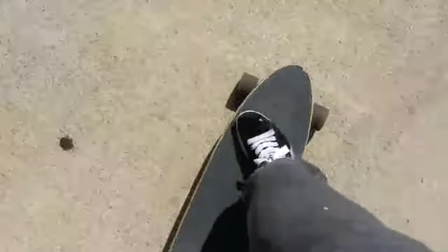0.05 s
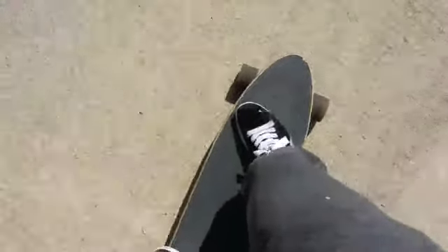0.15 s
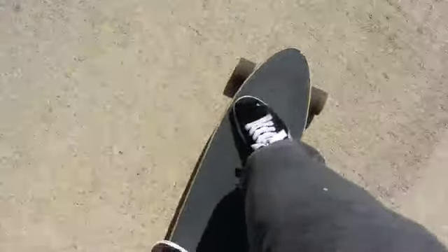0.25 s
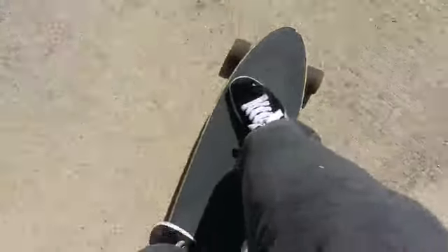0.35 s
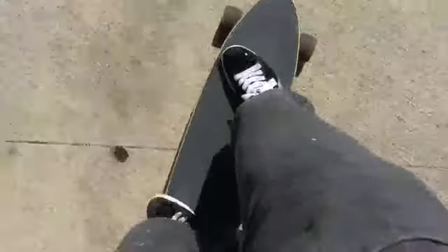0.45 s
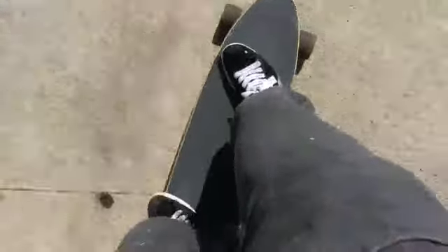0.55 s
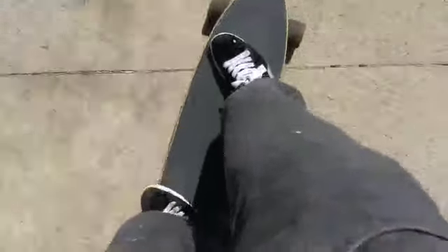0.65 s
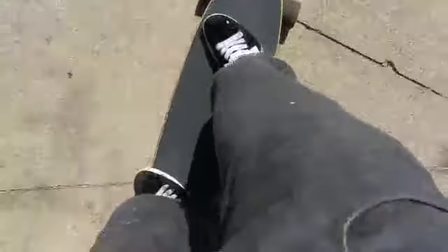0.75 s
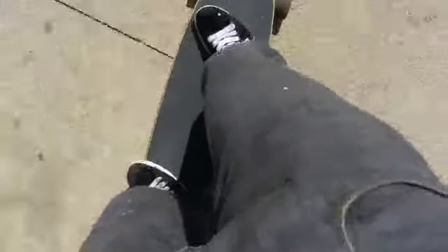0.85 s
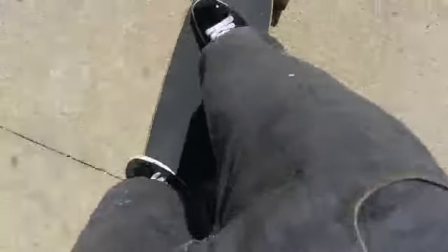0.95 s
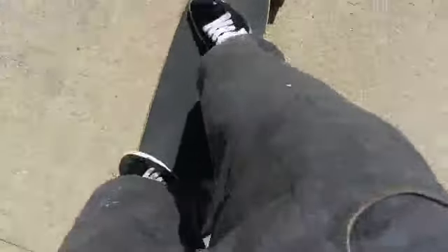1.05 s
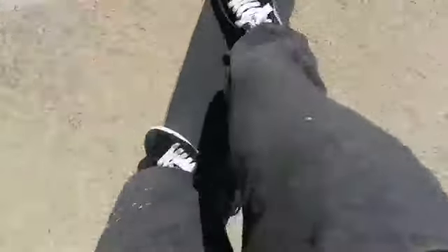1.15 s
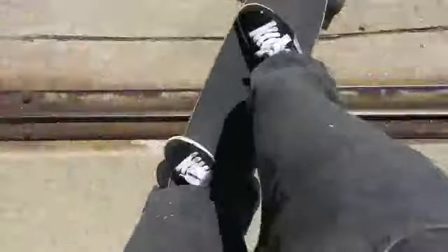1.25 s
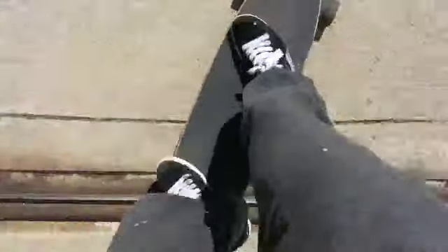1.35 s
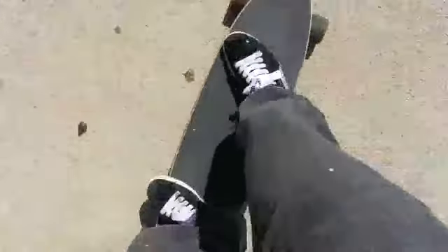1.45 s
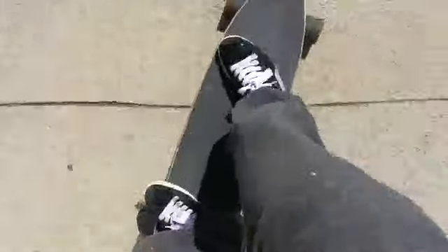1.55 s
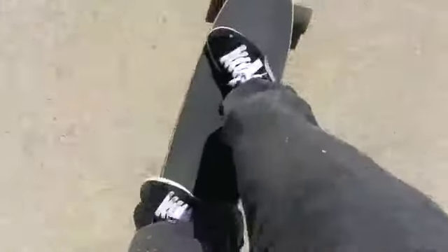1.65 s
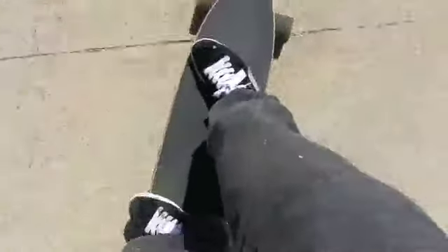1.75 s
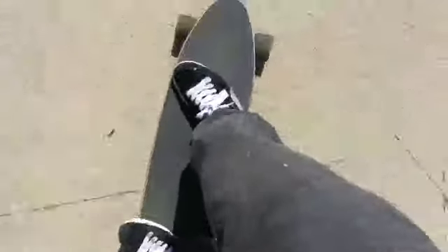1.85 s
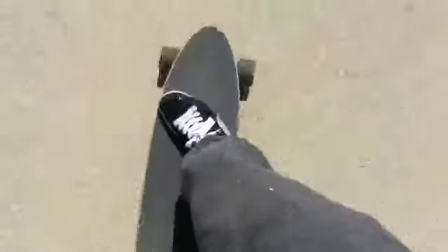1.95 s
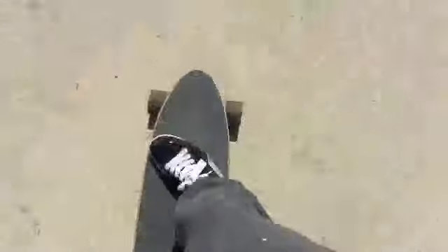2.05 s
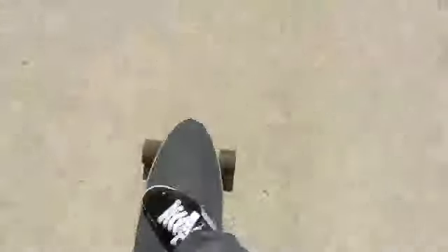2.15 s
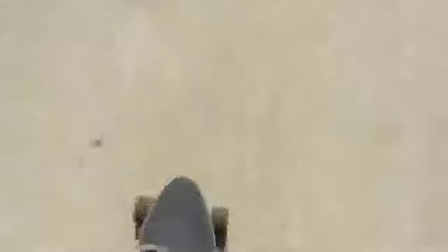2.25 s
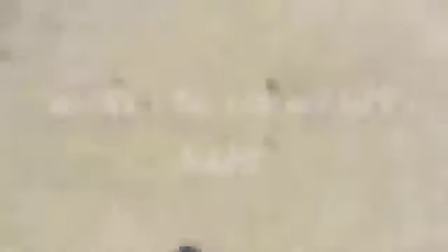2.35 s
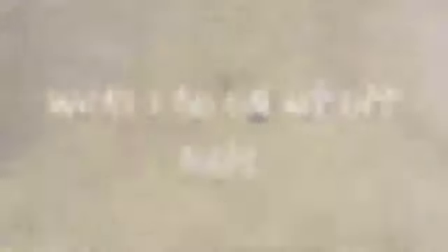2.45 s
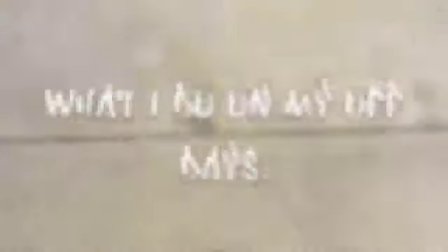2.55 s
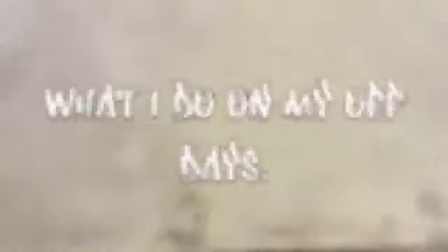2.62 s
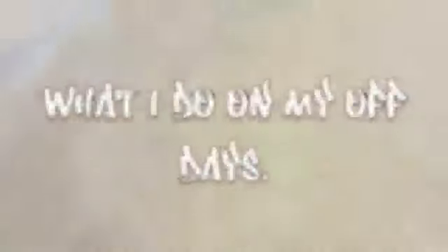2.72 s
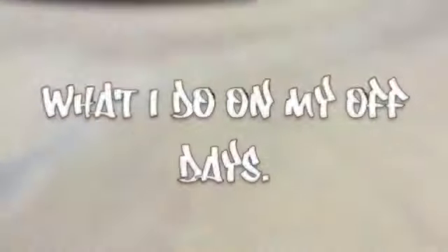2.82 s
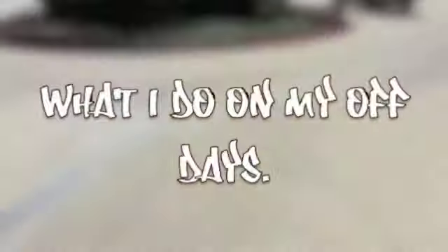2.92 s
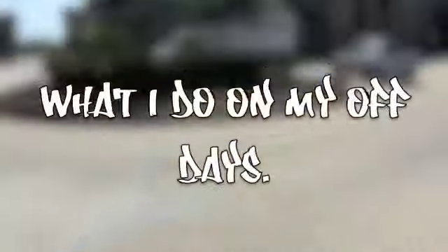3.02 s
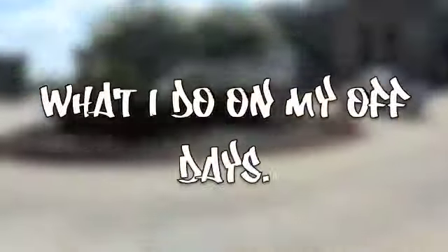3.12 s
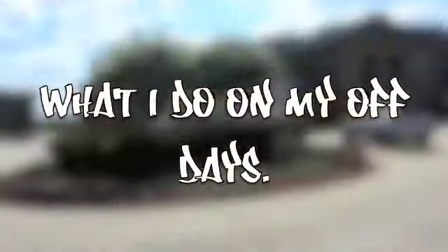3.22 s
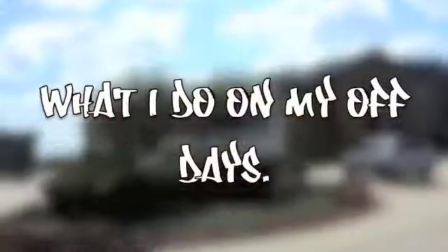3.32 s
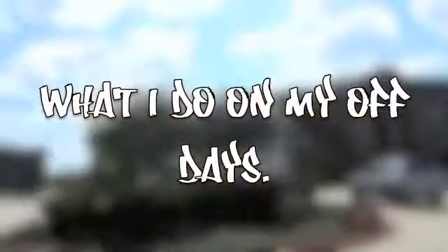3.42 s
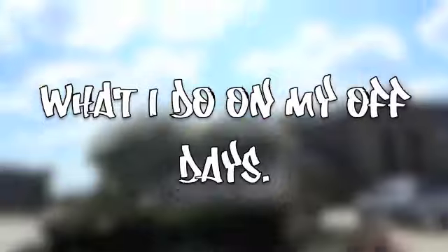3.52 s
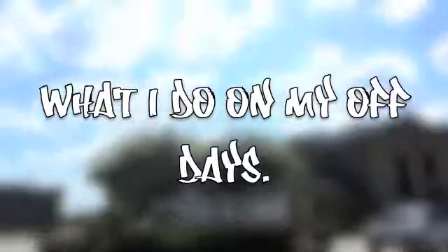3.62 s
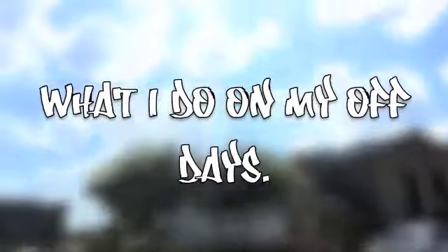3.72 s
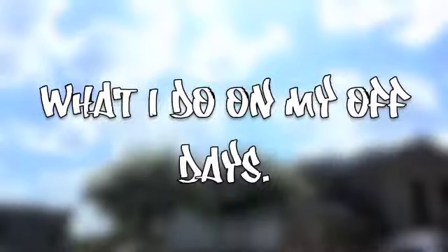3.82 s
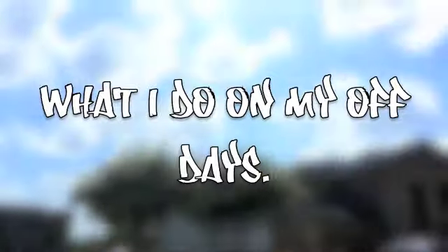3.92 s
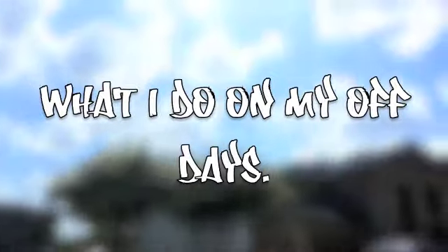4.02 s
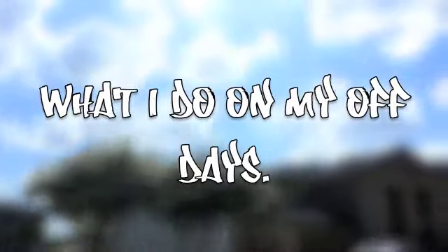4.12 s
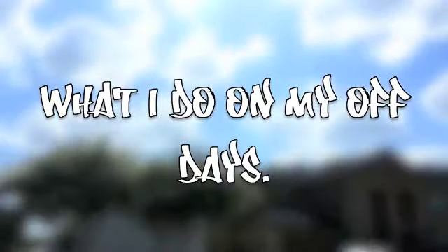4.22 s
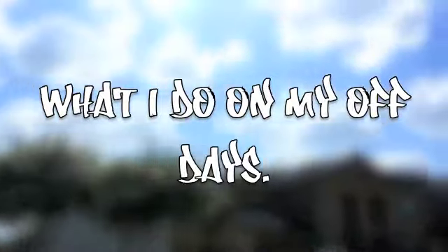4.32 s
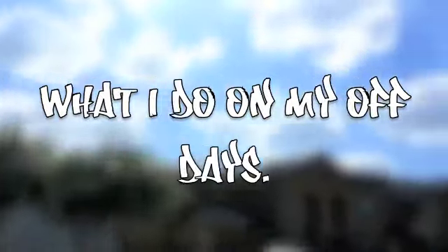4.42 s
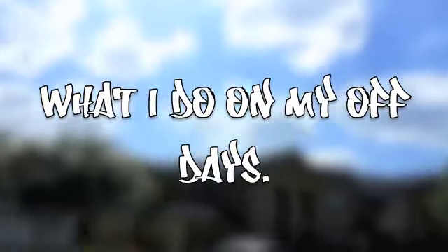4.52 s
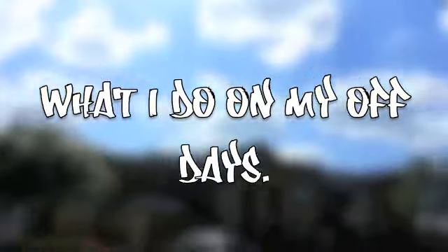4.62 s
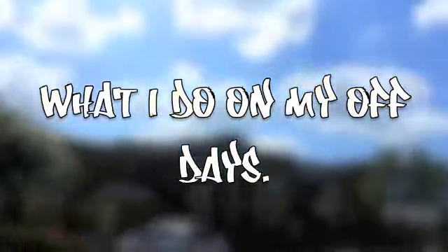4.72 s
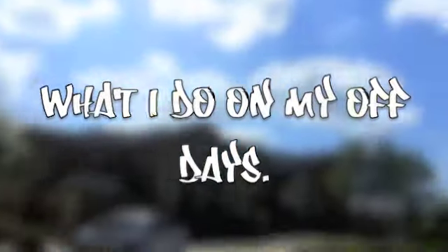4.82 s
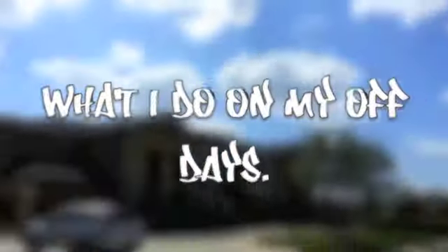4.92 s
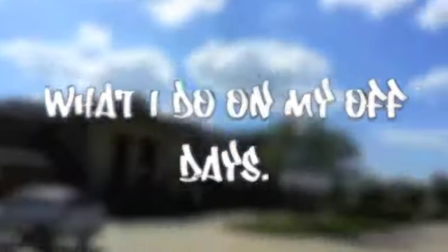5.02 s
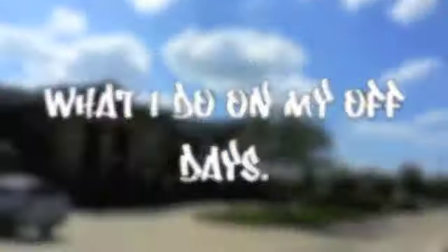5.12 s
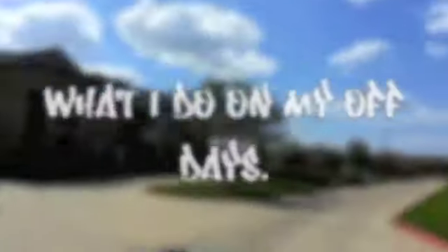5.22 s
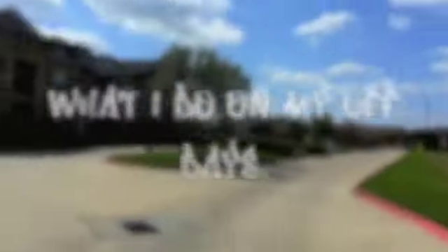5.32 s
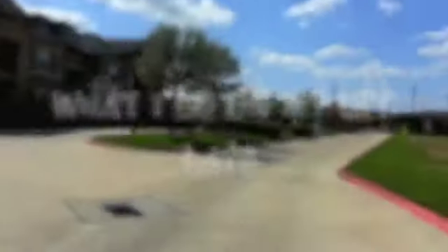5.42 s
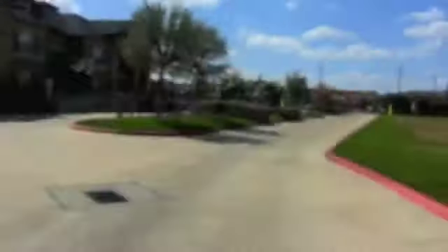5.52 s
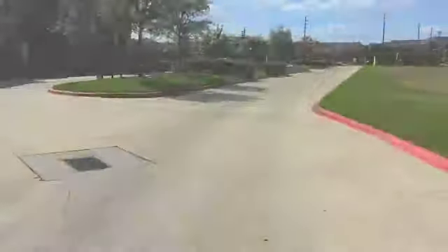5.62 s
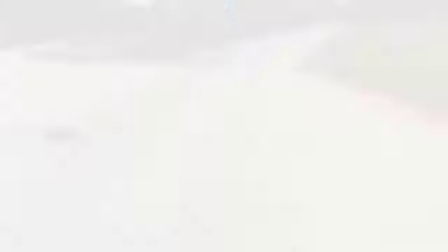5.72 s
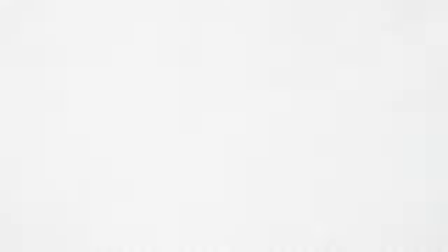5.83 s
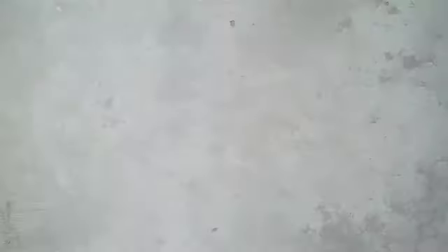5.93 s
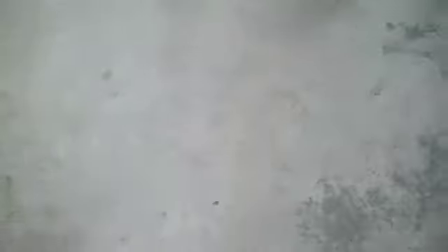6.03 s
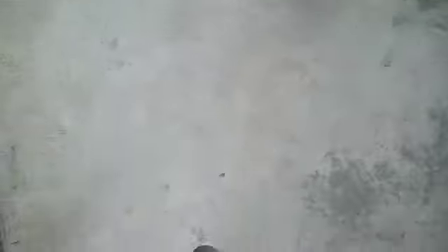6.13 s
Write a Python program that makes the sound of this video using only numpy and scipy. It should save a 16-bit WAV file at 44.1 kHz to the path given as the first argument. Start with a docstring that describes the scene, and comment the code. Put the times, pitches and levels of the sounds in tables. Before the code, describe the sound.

From 0 s a longboard is already rolling on coarse concrete, close and dry outdoors at a handheld stereo microphone: a woody low-mid drone, grainy tread scrape, popping grit, a loose washer's tinny ticks and irregular hollow knocks. Around 0.95 s the tread hiss surges with short low thumps; at 1.09-1.2 s the front wheels smash over a loose steel cover, a dense, choked clanging rattle, and at 1.32-1.41 s the rear wheels strike it again, loud and clipped. Small rattles die by 1.55 s. Softer rolling follows, with light knocks near 2.0 and 2.2 s and a faint thin whistle at 2.25 s. Hard paired knocks hit at 2.88 and 3.12 s. Faint falling whistles come at 3.4-4.1 s as a narrow hiss grows. From 4.7 s bright sand rasps beneath buzzing washer ticks, with one small knock. Everything fades from 5.67 to silence at 5.85 s.

```python
"""A longboard rolls along a concrete pavement, heard at a two-port microphone in the rider's hand.
From the start, grain noise drives deck and tread, grit pops, a loose washer pings and wheel knocks ring modes.
The tread flares just before both axles clatter over a loose steel drain cover at about 1.1 s (choked ringing
modes, noise bursts); short low noise thumps fall from 1.0 s, thin gliding sines whistle from 2.3 s, a joint
knocks at 2.9 s, sand rasps from 4.7 s, and the sound fades out from 5.7 s. The hardest blows are clipped."""
import sys
import numpy as np
from scipy import signal
from scipy.fft import rfft, irfft
from scipy.io import wavfile

SR = 44100
rng = np.random.default_rng(int(sys.argv[2]) if len(sys.argv) > 2 else 0)


def unload_wav(signal):
    """Save mono or channel-first audio to the path in sys.argv[1] as 16-bit WAV at rate SR, clipped to [-1, 1]."""
    wavfile.write(
        sys.argv[1],
        SR,
        np.round(np.clip(np.atleast_2d(signal).T, -1, 1) * 32767).astype(np.int16),
    )


N = 272097
TIME = np.arange(N) / SR  # s
FREQ = np.fft.rfftfreq(N, 1 / SR)  # Hz

# All levels are relative: layer gains and the microphone gain are applied later.

# Spectrum of the steady airstream at the microphone. Each row: frequency in Hz, density in dB per Hz.
BREEZE_SPECTRUM = [(20, -27.5), (45, -12), (70, -1.5), (140, 0.5), (220, -14.5), (2000, -110)]
BREEZE_DB = -48
# Spectrum of the low thumps. Each row: frequency in Hz, density in dB per Hz.
THUMP_SPECTRUM = [(20, -23), (60, -22.5), (120, -6), (180, -1.5), (240, 6), (330, -7.5), (600, -16),
                  (2000, -60)]
# Short low thumps, most of them stronger at the right port. Each row: start in seconds, level in dB,
# length in seconds, left-minus-right gain in dB (on top of the ports' own tilt).
THUMPS = [(0.997, -14.5, 0.012, -17.5), (1.013, -15.5, .011, -20.5), (1.225, -28.5, 0.03, -22),
          (1.269, -27, 0.025, -21), (1.347, -28, 0.19, -13), (1.93, -22.5, 0.042, -17),
          (1.996, -19, 0.01, -14), (3.115, -22, 0.035, 2), (4.756, -27, 0.015, 1)]
# Thin high whistles. Each row: start in seconds, length in seconds, start in Hz, end in Hz, level in dB.
WHISTLES = [(2.253, 0.12, 4830, 4820, -54.5), (3.434, 0.25, 9060, 8480, -54.5),
            (3.58, 0.28, 9800, 9400, -64), (3.86, 0.26, 9100, 8700, -65), (3.425, 0.24, 13750, 13480, -70),
            (3.823, 0.25, 14220, 14080, -70)]

# Spectrum of sand under the tread. Each row: frequency in Hz, density in dB per Hz.
SAND_SPECTRUM = [(3000, -29), (4400, 3), (5150, -1), (5600, -10), (7500, -32), (10000, -42), (11700, -18),
                 (14500, -38)]
# The sandy stretch. One row: start in seconds, end in seconds, level in dB.
SANDY_STRETCH = (4.7, 5.86, -52)
# Spectrum of loose grit under a wheel. Each row: frequency in Hz, density in dB per Hz.
POPS_SPECTRUM = [(300, -25), (700, 2), (1500, -2), (2500, -7.5), (4000, -23.5), (9000, -49.5)]
# level at the mean rumble, dB gained per dB of rumble, mean rate
POPS_DB, POPS_FOLLOW, POPS_PER_S = -43.5, 0.9, 320

# Modes of the washer's ping. Each row: frequency in Hz before the pitch factor, level in dB, t60 in seconds.
WASHER_MODES = [(1900, -16, .015), (2700, -16, .008), (3370, -6, .005), (3550, -1.5, .008),
                (3800, -5, .005), (4250, -13, .004), (5150, -17, .003)]
# Spells of rattling axle hardware. Each row: start in seconds, end in seconds, level in dB.
CHATTERS = [(0, 0.192, -50), (.318, 1.48, -44), (1.5, 2.05, -49.5), (3.15, 3.425, -48),
            (3.53, 4.504, -51.5), (4.54, 4.9, -45), (4.934, 5.343, -42), (5.402, 5.8, -44)]
CHATTER_RISE_S, CHATTER_FALL_DB_PER_S = 0.023, 38
CHATTER_PER_S = 150  # bounce rate before its random drift
# The washer's clearest ticks. Each row: start in seconds, peak level in dB before TICK_DB is added.
TICKS = [(0.0174, -29.5), (0.0493, -31), (0.1491, -34), (0.165, -27), (0.1814, -27), (0.2563, -34),
         (0.3706, -28), (0.4189, -31), (0.4798, -34), (0.5571, -31), (0.5846, -27), (0.6175, -29.5),
         (0.6794, -28), (0.6964, -26), (0.7412, -25), (0.836, -32), (0.9517, -30), (0.9592, -26.5),
         (1.047, -24), (1.068, -19), (3.2226, -29.5), (3.2331, -32), (3.2545, -33), (3.2964, -31),
         (3.365, -28), (3.391, -31), (3.4028, -28), (3.4466, -34), (3.5414, -35), (3.5618, -32),
         (3.6122, -34), (4.6334, -35), (4.7062, -32), (4.7566, -24.5), (4.7612, -24), (4.8125, -33.5),
         (4.946, -33), (4.995, -25.5), (5.0439, -27), (5.255, -29), (5.2664, -28.5), (5.5084, -29.5)]
TICK_DB, TICK_T60_S = 1.5, 0.045

# Modes of the steel cover. Each row: frequency in Hz before detuning, level in dB, t60 in seconds.
STEEL_MODES = [(382, 1.5, 0.069), (1066, -5, .2), (1120, 2, .2), (1180, -5, 0.2), (1250, -13, .12),
               (1375, -14.5, .15), (1470, -12, .2), (1511, -4.5, .2), (1563, -4, .22), (1630, -3, .13),
               (1720, -8.5, .15), (1755, -4, .22), (1960, -11.5, .11), (2110, -10, .08), (2950, -13, .1),
               (3284, -11.5, .14), (3430, -11.5, .12), (3945, -8, .13), (4100, -4.5, .13),
               (4220, -7.5, .11), (4400, -10.5, .09), (4450, -7.5, .13), (4670, -11.5, .08)]
DETUNE = 0.005  # the wheels' weight shifts each mode by about this share from contact to contact
# Spectrum of steel on its frame. Each row: frequency in Hz, density in dB per Hz.
CLASH_SPECTRUM = [(150, -25.5), (400, 6), (750, -3), (1150, 2.5), (1750, -1), (2400, -7.5), (4300, -2),
                  (5500, -9.5), (8000, -13.5), (12500, -22.5), (14500, -23.5)]
# The cover rattling in its frame. Each row: start in seconds, ring level in dB, clash level in dB,
# brightness of the ring in dB per octave.
RATTLES = [(1.091, -2, -11, -2.5), (1.105, -8, -4.5, 1), (1.117, -10, -3, 5), (1.131, -1.5, -7.5, -1),
           (1.149, -7.5, -9.5, 2.5), (1.162, -9.5, -6, 0), (1.172, -14, -11, 1.5), (1.183, -9.5, -13, -1.5),
           (1.203, -19.5, -22, 1), (1.219, -23.5, -22, 1), (1.235, -22, -27.5, -1), (1.248, -24.5, -29, 1),
           (1.265, -20.5, -27.5, -0.5), (1.297, -23.5, -27, -3.5), (1.322, -12, -19, 7.5),
           (1.3257, -10.5, -13.5, 6.5), (1.33, -14.5, -6.5, 7), (1.34, -18, -11.5, 0.5),
           (1.352, -18, -17.5, 0.5), (1.374, -13, -19.5, 0), (1.383, -21.5, -14.5, 4.5),
           (1.397, -15.5, -22.5, -0.5), (1.461, -27.5, -35, -4), (1.494, -25, -34.5, -6.5),
           (1.527, -32.5, -38, 1.5)]
# A harder contact damps more. Each row: ring level of the contact in dB, share of the old ring that is left.
CHOKE = [(-27.5, 0.78), (-6, 0.41)]

# Modes of the wooden deck. Each row: frequency in Hz before the pitch factor, level in dB, t60 in seconds.
DECK_MODES = [(260, -16, 0.12), (325, -9, 0.051), (415, -6, 0.019), (467.7, 4.5, 0.067), (532, -5, 0.015),
              (688, -8, 0.031), (843, -13.5, 0.027)]
# Modes of the axles. Each row: frequency in Hz before the pitch factor, level in dB, t60 in seconds.
AXLE_MODES = [(659, 2, 0.058), (867, 0.5, 0.045), (975, -1.5, 0.037), (1262, -5.5, 0.034),
              (1593, -6.5, 0.037), (1755, -4.5, .04), (1935, -3.5, 0.045), (2750, -5, .035),
              (2893, -9.5, .035), (3500, -3.5, 0.021), (3570, -7.5, 0.022), (4350, -9.5, .02)]
# Spectrum of a wheel on an edge. Each row: frequency in Hz, density in dB per Hz.
CRACK_SPECTRUM = [(100, -16), (350, 8.5), (650, 2), (900, -4.5), (1600, -8), (2800, -7), (4000, -9),
                  (6000, -21), (9000, -30.5), (14500, -36.5)]
# A wheel meets an edge of the pavement or of the cover, the rear pair about 0.23 s after the front.
# Each row: start in seconds, deck level in dB, crack level in dB, axle ping level in dB,
# deck pitch as a factor.
KNOCKS = [(.004, -2, -21, -28, 0.97), (.097, -6.5, -28.5, -25, 1.03), (.259, -22, -26.5, -26, .8),
          (.375, -7, -21.5, -21, 0.83), (.484, -6, -24.5, -26, 0.81), (.628, -12, -28, -29, 0.88),
          (.745, -11, -26.5, -28.5, 1.02), (.953, -6, -20.5, -26, 1.01), (.97, -12, -23, -25.5, 1.11),
          (1.093, -11, -10.5, -14, 0.95), (1.107, -1, -5.5, -8, 0.87), (1.143, -9, -22, -24, 0.81),
          (1.163, -10, -14.5, -15.5, 1.04), (1.184, -12, -20, -19, .94), (1.266, -6.5, -19, -20, .9),
          (1.28, -13, -21, -21, 0.93), (1.326, -14, -17, -16, .62), (1.338, -7, -6.5, -11.5, 0.57),
          (1.3594, 0, -6.5, -8.5, 1.13), (1.365, -5, -10, -14.5, 1.35), (1.378, -9, -5.5, -13.5, 1.3),
          (1.3945, 1.5, -7, -4.5, 1.04), (1.401, -4, -10.5, -10, 1.42), (1.4125, -3, -12.5, -13.5, 1.02),
          (1.498, -10, -26.5, -26, 0.92), (1.962, -12, -27, -26, 0.804), (1.997, -13, -25, -23.5, 1),
          (2.034, -8.5, -29.5, -22, 1.05), (2.196, -8.5, -33, -25, .96), (2.872, 4.5, -10, -8.5, 0.89),
          (2.885, 5, -10.5, -6.5, 0.96), (2.896, -11, -14, -16, 0.93), (2.917, -19, -20.5, -25.5, 1),
          (3.108, -7, -13.5, -14.5, 0.98), (3.123, -4.5, -12, -12.5, .7), (3.128, -8.5, -14.5, -12.5, 1.53),
          (3.14, 2, -12.5, -13.5, 1), (3.154, 0, -13.5, -17.5, 1.01), (4.7565, -10.5, -21, -25, 0.6)]

# Spectrum of the narrow tread hiss. Each row: frequency in Hz, density in dB per Hz.
SWISH_SPECTRUM = [(900, -62.5), (1700, -29.5), (2300, -5), (2700, 4), (3100, -7), (3500, -24), (7000, -28),
                  (11000, -71)]
# The smoother pavement. One row: start in seconds, end in seconds, level in dB.
SMOOTH_STRETCH = (1.6, 6.3, -42.5)
SWISH_RISE_S = 3.2
# Spots in the concrete that grind the tread. Each row: middle in seconds, length in seconds, gain in dB.
ROUGH_SPOTS = [(.018, .033, 1.5), (0.038, .025, 4.5), (.135, .03, -5), (0.182, .03, 2), (.215, .06, -3),
               (0.438, .03, 3.5), (0.506, 0.048, 6.5), (0.538, 0.057, 3.5), (.583, .028, 4),
               (.698, .027, 2.5), (.752, 0.032, 2), (.97, .02, 2), (1.074, .018, 4), (1.97, 0.064, 5),
               (2.032, 0.054, 3), (2.086, .028, 2), (2.403, 0.033, 0), (3.235, 0.079, 6.5), (3.56, .035, 3),
               (5.516, .023, 5)]
# How hard the pavement shakes the board. Each row: time in seconds, deck drone in dB, coarse rumble in dB.
PAVEMENT = [(0.0, -21.5, -26), (0.389, -23.5, -21.5), (0.86, -21.5, -24.5), (1.22, -21.5, -27.5),
            (1.33, -21, -18), (1.59, -24.5, -26.5), (1.9, -28, -26.5), (2.1, -23.5, -32),
            (2.49, -27.5, -30.5), (3.06, -27, -42), (3.29, -28.5, -34.5), (4.08, -29.5, -41),
            (4.78, -29, -37.5), (5.15, -28.5, -33), (5.38, -26.5, -40.5), (5.55, -30, -35.5)]
DRONE_DB, RUMBLE_DB = 1.48, -1.34  # added to the pavement's two levels
# tread level at the mean shaking, and dB gained per dB of shaking
SCRAPE_DB, SCRAPE_FOLLOW = -37.5, 0.14
HISS_DB, HISS_FOLLOW = -45, 0.67
# The tread flares just before the clatter and dies away through it. One row: start of the rise in seconds,
# start of the fall in seconds, scrape level in dB, hiss level in dB (neither reached in full, as the fall
# starts before the rise).
FLARE = (0.93, 0.9, -25, -27)
FLARE_RISE_S, FLARE_FALL_DB_PER_S = 0.048, 31
# dust level at the mean rumble, dB gained per dB of rumble, dust level added in the flare
FIZZ_DB, FIZZ_FOLLOW, FLARE_FIZZ_DB = -69, 1.45, -48
# Spectrum of the deck drone. Each row: frequency in Hz, density in dB per Hz.
DRONE_SPECTRUM = [(120, -27.5), (200, -13), (247, -11.5), (376, -1.5), (489, 2), (564, -4), (668, -8),
                  (739, -11), (846, -11), (1120, -18.5), (1280, -25), (1500, -21.5), (1950, -36.5),
                  (3300, -120)]
# Spectrum of the coarse rumble. Each row: frequency in Hz, density in dB per Hz.
RUMBLE_SPECTRUM = [(20, -35), (45, -25), (85, -6.5), (170, -5), (250, 5), (320, 2), (420, -4.5),
                   (800, -23.5), (2000, -67)]
# Spectrum of the tread's scrape. Each row: frequency in Hz, density in dB per Hz.
SCRAPE_SPECTRUM = [(400, -14), (800, 5.5), (1350, 3.5), (1720, -1), (1900, 4.5), (2150, 1.5), (2650, -5),
                   (3100, -3.5), (3900, -16), (5500, -31), (9000, -72)]
# Spectrum of the tread's hiss. Each row: frequency in Hz, density in dB per Hz.
HISS_SPECTRUM = [(1000, -8), (2000, 1), (3000, 0), (3600, -0.5), (4150, 1), (4700, -3), (5300, -4),
                 (6300, -10.5), (7400, -12.5), (9500, -21.5), (11000, -23.5), (12500, -22.5),
                 (14500, -37.5)]
# Spectrum of crushed dust. Each row: frequency in Hz, density in dB per Hz.
FIZZ_SPECTRUM = [(7000, -32), (10000, -10.5), (11800, 4.5), (14500, 0.5)]

# Likeness of the two ports. Each row: frequency in Hz, left-right likeness from 0 to 1.
PORT_LIKENESS = [(60, 0.5), (130, 0.52), (230, 0.98), (460, 0.99), (900, 0.86), (1400, 0.38), (2000, 0.49),
                 (3300, 0.25), (4500, 0.07), (14000, .05)]
# Phase between the ports. Each row: frequency in Hz, radians by which left leads (negative: right leads).
PORT_LEAD = [(100, -0.6), (500, -0.26), (1100, -0.43), (1800, -1.63), (2400, -0.9), (3200, -1.46),
             (5000, -2)]
# Balance of the ports. Each row: frequency in Hz, left-minus-right level in dB.
PORT_TILT = [(60, -1), (130, -2), (280, 0), (1000, -0.5), (2000, 0.5), (3100, 3), (3800, -2.5), (4700, -4),
             (6000, -5.5), (7200, -4.5), (8200, -5.5), (12000, 3.5)]
LOW_CUT_HZ, EDGE_HZ = 60, 14600
GAIN_DB, CEILING = 2.5, 1.05
FADE_START_S, FADE_END_S = 5.666, 5.853


def amp(db):
    """Decibels to amplitude ratio."""
    return 10 ** (np.asarray(db) / 20)


def unit(x):
    """Normalisation to rms 1."""
    return x / np.sqrt(np.mean(x ** 2) + 1e-20)


def read(points, hz):
    """Linear interpolation of a table on a log-frequency axis."""
    f, value = np.transpose(points)
    return np.interp(np.log(hz + 1), np.log(f + 1), value)


def add(mix, s, sound):
    """Superposition: mixes a sound in, in place, at a time in seconds."""
    part = mix[..., max(round(s * SR), 0):][..., :sound.shape[-1]]
    part += sound[..., :part.shape[-1]]


def colour(x, spectrum):
    """Zero-phase filtering by a spectrum table."""
    return irfft(rfft(x) * amp(read(spectrum, FREQ)), N)


def keep_level(x, spectrum):
    """Spectral colouring that preserves the power of white sound."""
    return colour(x, spectrum) / np.sqrt(np.mean(amp(read(spectrum, FREQ)) ** 2))


def wander(hz):
    """Low-passed noise: a random drift of rms 1, up to a rate."""
    noise = rfft(rng.standard_normal(N))
    return unit(irfft(noise / (1 + (FREQ / hz) ** 4), N))


def spell(start, end, rise_s, fall_db_per_s):
    """Envelope: a linear rise from start times an exponential decay from end."""
    rise = np.clip((TIME - start) / rise_s, 0, 1)
    return rise * amp(-fall_db_per_s * np.maximum(TIME - end, 0))


def ring(modes, scatter=0., pitch=0.98, length=SR // 2):
    """Modal decay, alternating in sign; scatter varies mode weights with the place of the blow."""
    hz, db, t60 = np.transpose(modes)[:, :, None]
    t = TIME[:length]
    weight = amp(db) * (1 + scatter * rng.standard_normal(hz.shape))
    weight[1::2] *= -1
    partials = weight * amp(-60 * t / t60) * np.sin(2 * np.pi * hz * pitch * t)
    return partials.sum(0) / np.linalg.norm(amp(db))


def burst(t60):
    """Impact noise: two channels that rise in a few milliseconds and decay exponentially."""
    t = TIME[:SR // 3]
    return rng.standard_normal((2, len(t))) * amp(-60 * t / t60) * (1 - np.exp(-t / 0.00097))


def grit(per_s, spread_db):
    """Random impulse train: contacts with grains of the concrete, many small and a few large."""
    size = amp(spread_db * np.minimum(rng.exponential(1, N), 5))
    return size * (rng.random(N) < per_s / SR) * rng.choice([-1, 1], N)


def ports(pair):
    """Partial coherence: two ports alike in the middle range, less so in bass and treble."""
    a, b = rfft(pair)
    same = np.clip(read(PORT_LIKENESS, FREQ), 0, 1)
    right = same * a + np.sqrt(1 - same ** 2) * b
    right = right * np.exp(-1j * read(PORT_LEAD, FREQ))
    lean = amp(read(PORT_TILT, FREQ) / 2)
    return irfft(np.array([a * lean, right / lean]), N)


def breeze():
    """Steady flow noise: the airstream of the ride rumbles softly at the microphone."""
    air = unit(colour(rng.standard_normal((2, N)), BREEZE_SPECTRUM))
    return ports(amp(BREEZE_DB) * air)


def thumps():
    """Windowed low-frequency noise: short low thumps, most of them stronger at the right port."""
    out = np.zeros((2, N))
    low_noise = ports(colour(rng.standard_normal((2, N)), THUMP_SPECTRUM))
    for s, db, length, pan_db in THUMPS:
        window = signal.windows.tukey(int(length * SR), 0.7)
        thump = unit(window * low_noise[:, round(s * SR):][:, :len(window)])
        add(out, s, amp([[db + pan_db / 2], [db - pan_db / 2]]) * thump)
    return out


def whistles():
    """Frequency-modulated sines: faint, slightly falling, fuzzy and fluttering, that trail away."""
    out = np.zeros(N)
    for s, length, start_hz, end_hz, db in WHISTLES:
        u = np.linspace(0, 1, int(length * SR))
        glide = np.interp(u ** 0.35, [0, 1], [start_hz, end_hz])
        hz = glide * (1 + 0.014 * wander(hz=450)[:len(u)])
        flutter = amp(4 * wander(hz=110)[:len(u)])
        swell = np.minimum(u / 0.12, 1) * (1 - u) ** 1.5 * flutter
        add(out, s, amp(db) * unit(swell * np.sin(2 * np.pi * np.cumsum(hz) / SR)))
    return out * amp([[-1], [1]])  # right louder by 2 dB


def sand():
    """Granular fracture: separate sand grains crack under the tread in a bright rasp."""
    start, end, db = SANDY_STRETCH
    crush = amp(4 * wander(hz=120))
    grains = np.array([grit(per_s=1800, spread_db=6.0) for _ in range(2)]) * crush
    gain = amp(db) * spell(start, end, rise_s=0.24, fall_db_per_s=29)
    return ports(unit(colour(grains, SAND_SPECTRUM)) * gain)


def crackle():
    """Random impacts: loose grit pops under the wheels in irregular clumps, most on coarse stretches."""
    rumble = rolling_gains()[1]
    snap = burst(t60=0.012)[:, :SR // 50]
    clumps = amp(3 * wander(hz=18))
    grains = grit(per_s=POPS_PER_S, spread_db=2.5) * clumps
    pops = unit(colour(signal.fftconvolve(grains[None], snap, axes=1)[:, :N], POPS_SPECTRUM))
    return ports(amp(POPS_DB) * pops * (rumble / rumble.mean()) ** POPS_FOLLOW)


def chatter():
    """Repeated impact: a loose washer bounces unevenly in short buzzing pings, with some clear ticks."""
    rate = CHATTER_PER_S * amp(3 * wander(hz=90))
    bounces = np.floor(np.cumsum(rate) / SR)
    strength = amp(3.5 * np.clip(rng.standard_normal(N), -2, 1.3))
    taps = np.diff(bounces, prepend=bounces[0]) * strength
    decay = np.exp(-1 / (0.0025 * SR))  # the buzz of a tap dies with a 2.5 ms time constant
    contact = signal.lfilter([1], [1, -decay], taps) * rng.standard_normal(N)
    spells = [amp(db) * spell(start, end, CHATTER_RISE_S, CHATTER_FALL_DB_PER_S)
              for start, end, db in CHATTERS]
    pings = unit(signal.oaconvolve(contact, ring(WASHER_MODES))[:N]) * np.max(spells, axis=0)
    for s, db in TICKS:
        tick = signal.fftconvolve(burst(t60=TICK_T60_S)[0], ring(WASHER_MODES, length=SR // 20))
        add(pings, s, amp(db + TICK_DB) * tick / abs(tick).max())
    return np.array([np.roll(pings, 1), pings])  # reaches the right port first


def drain_cover():
    """Plate modes with contact damping: each bounce chokes the ring, clashes and starts a new ring."""
    steel, clash = np.zeros((2, N)), np.zeros((2, N))
    for s, ring_db, clash_db, bright_db in RATTLES:
        modes = [(hz * (1 + DETUNE * rng.standard_normal()), db + bright_db * np.log2(hz / 1500), t60)
                 for hz, db, t60 in STEEL_MODES]
        left_over = np.interp(ring_db, *np.transpose(CHOKE))
        steel *= np.interp(TIME, [s - 0.003, s], [1, left_over])
        rings = np.array([ring(modes, scatter=0.4, pitch=1, length=SR // 3) for _ in range(2)])
        add(steel, s, amp(ring_db) * rings)
        add(clash, s, amp(clash_db) * burst(t60=0.075))
        add(clash, s, amp(clash_db + 6) * burst(t60=0.014))  # the sharp snap
    clash *= amp(2 * wander(hz=450))  # the edges judder within each contact
    return ports(steel + keep_level(clash, CLASH_SPECTRUM))


def knocks():
    """Impulsive excitation: each edge snaps against the wheel, pings the axle and booms through the deck."""
    boom, crack, ping = np.zeros(N), np.zeros((2, N)), np.zeros((2, N))
    give = 1 - np.exp(-TIME[:SR // 6] / 0.0013)  # the soft wheel spreads the blow
    for s, deck_db, crack_db, ping_db, pitch in KNOCKS:
        deck = give * ring(DECK_MODES, scatter=0.07, pitch=pitch, length=len(give))
        add(boom, s, amp(deck_db - 1.0) * deck)
        add(crack, s, amp(crack_db - 7) * burst(t60=0.09))
        add(crack, s, amp(crack_db + 6) * burst(t60=0.01))
        axle = np.array([ring(AXLE_MODES, scatter=0.29, length=SR // 10) for _ in range(2)])
        add(ping, s, amp(ping_db) * axle)
    booms = np.array([np.roll(boom, 3), boom])  # reaches the right port first
    return booms + ports(keep_level(crack, CRACK_SPECTRUM) + ping)


def swish():
    """Band-limited friction noise: a narrow hiss of the tread that slowly grows on the smoother concrete."""
    start, end, db = SMOOTH_STRETCH
    gain = amp(db) * spell(start, end, SWISH_RISE_S, fall_db_per_s=30)
    return gain * unit(colour(rng.standard_normal((2, N)), SWISH_SPECTRUM))


def rough_spots():
    """Amplitude modulation: the tread swells as a wheel passes a rough spot and sinks on a smooth one."""
    db = np.zeros(N)
    for s, length, tread_db in ROUGH_SPOTS:
        add(db, s - length / 2, tread_db * np.hanning(int(length * SR)))
    return amp(db)


def rolling_gains():
    """Roughness excitation: gains of drone, rumble, scrape and hiss; the tread flares before the clatter."""
    s, *levels = np.transpose(PAVEMENT)
    shake_db, coarse_db = (np.interp(TIME, s, db) for db in levels)
    excess_db = shake_db - shake_db.mean()
    start, end, flare_scrape_db, flare_hiss_db = FLARE
    flare = spell(start, end, FLARE_RISE_S, FLARE_FALL_DB_PER_S)
    scrape = np.hypot(amp(SCRAPE_DB + SCRAPE_FOLLOW * excess_db), amp(flare_scrape_db) * flare)
    hiss = np.hypot(amp(HISS_DB + HISS_FOLLOW * excess_db), amp(flare_hiss_db) * flare)
    return amp(shake_db + DRONE_DB), amp(coarse_db + RUMBLE_DB), scrape, hiss


def rolling():
    """Forced vibration: grain contacts drive deck and tread; rough patches swell the bands together."""
    drone, rumble, scrape, hiss = rolling_gains()
    patches = amp(0.97 * wander(hz=25))
    scuffs = amp(0.72 * wander(hz=130))
    coarse = np.array([grit(per_s=3500, spread_db=2.5) for _ in range(2)]) * patches
    fine = np.array([grit(per_s=12000, spread_db=2.0) for _ in range(4)]) * patches * scuffs
    pebbles = np.array([grit(per_s=360, spread_db=2.5) for _ in range(2)]) * patches
    body = amp(-3) * unit(colour(coarse, DRONE_SPECTRUM))
    body += amp(-7) * unit(signal.oaconvolve(pebbles, ring(DECK_MODES)[None])[:, :N])
    low = unit(colour(rng.standard_normal((2, N)) * patches, RUMBLE_SPECTRUM))
    tread = scrape * unit(colour(fine[:2], SCRAPE_SPECTRUM))
    tread += hiss * unit(colour(fine[2:], HISS_SPECTRUM))
    dust = amp(FIZZ_DB) * (rumble / rumble.mean()) ** FIZZ_FOLLOW
    dust += amp(FLARE_FIZZ_DB) * spell(*FLARE[:2], FLARE_RISE_S, fall_db_per_s=90)
    fizz = dust * unit(colour(fine[:2], FIZZ_SPECTRUM))
    return ports(drone * body + rumble * low + fizz + tread * rough_spots() + swish())


def scene():
    """Superposition of all sources at the two ports."""
    background = breeze() + thumps() + whistles()
    loose = sand() + crackle() + chatter()
    return background + loose + drain_cover() + knocks() + rolling()


def record(dry):
    """Transducer limits: bass is shed, peaks are flattened; then a straight fade and a band limit."""
    lean = signal.lfilter(*signal.butter(2, LOW_CUT_HZ, "high", fs=SR), dry)
    clipped = np.clip(amp(GAIN_DB) * lean, -CEILING, CEILING)
    faded = clipped * np.interp(TIME, [FADE_START_S, FADE_END_S], [1, 0])
    low_pass = signal.firwin(511, EDGE_HZ, window=("kaiser", 8), fs=SR)
    return signal.oaconvolve(faded, low_pass[None], "same")


dry = scene()
out = record(dry)
unload_wav(out)
```